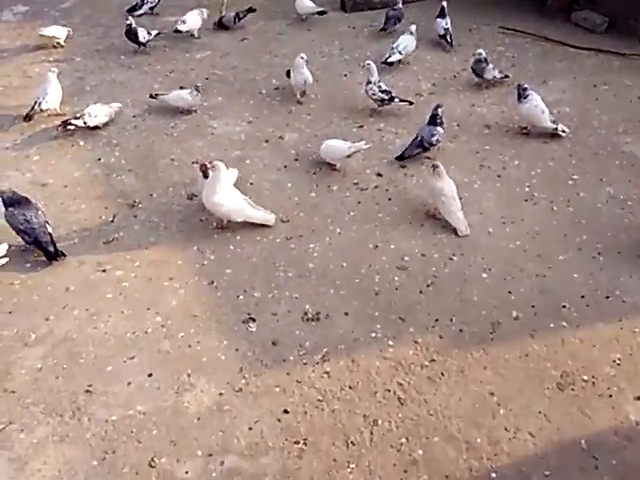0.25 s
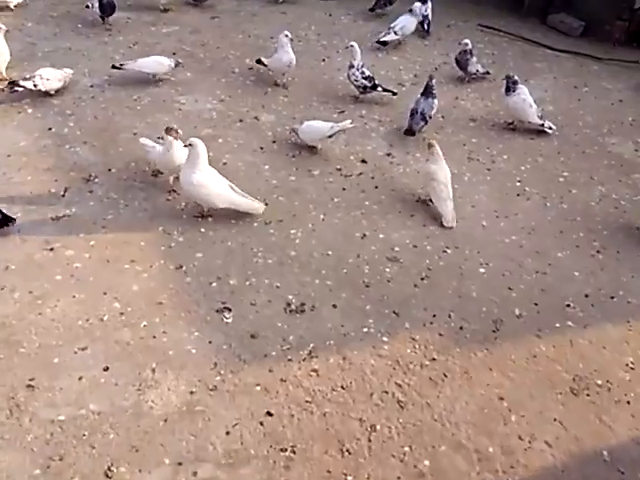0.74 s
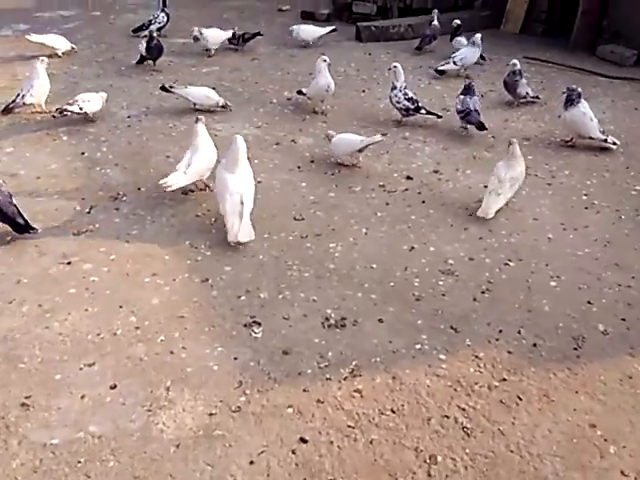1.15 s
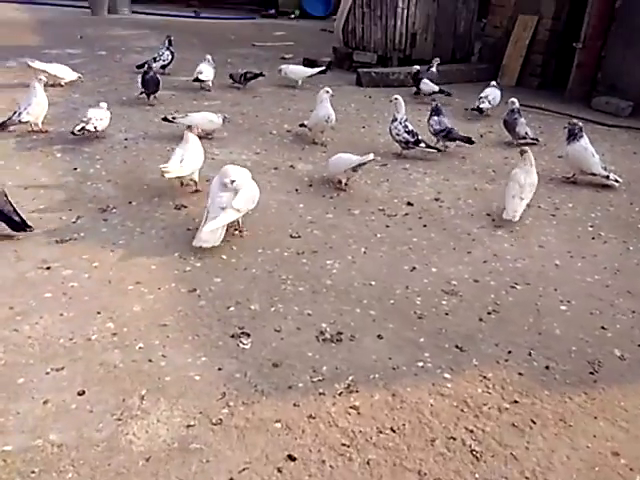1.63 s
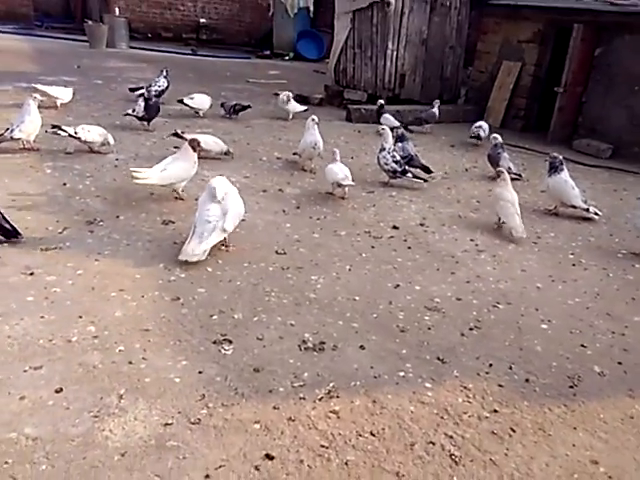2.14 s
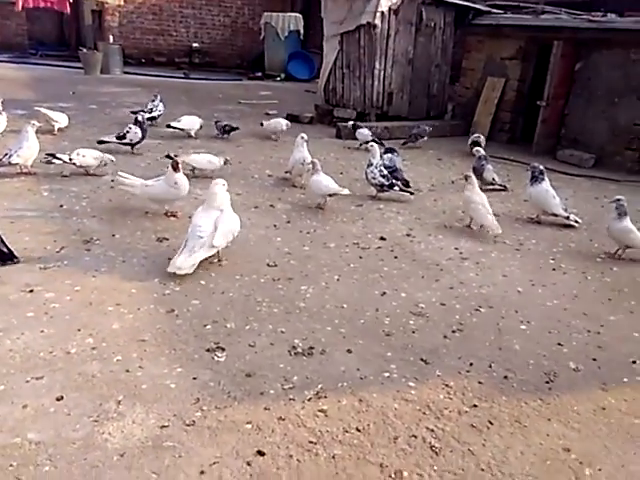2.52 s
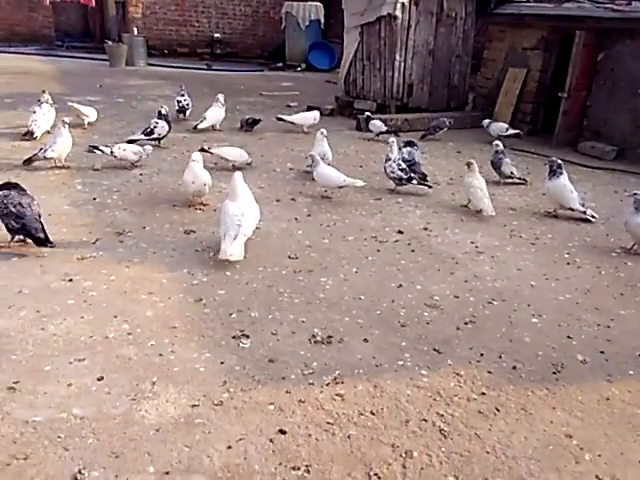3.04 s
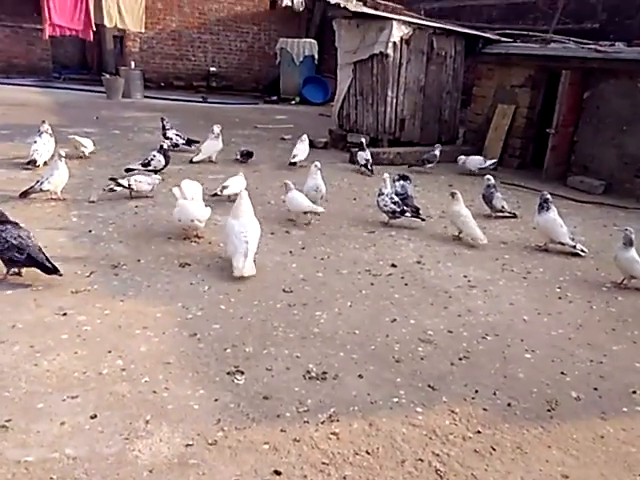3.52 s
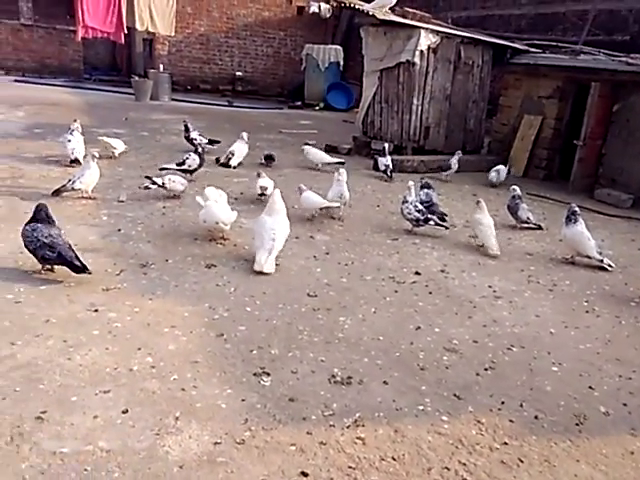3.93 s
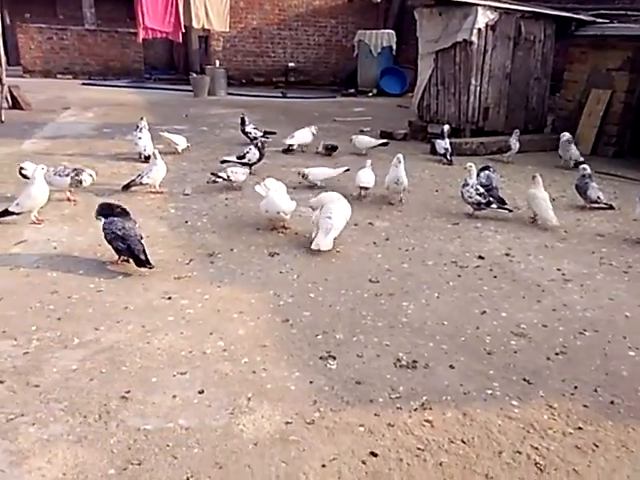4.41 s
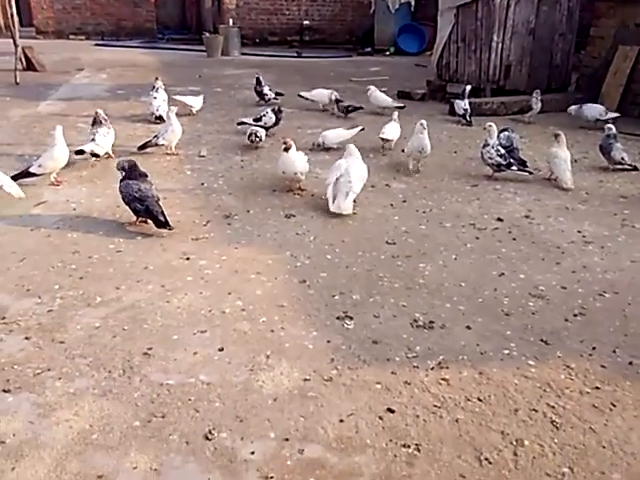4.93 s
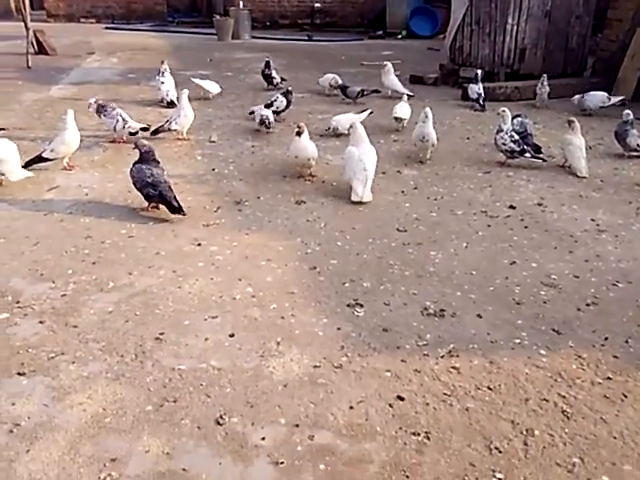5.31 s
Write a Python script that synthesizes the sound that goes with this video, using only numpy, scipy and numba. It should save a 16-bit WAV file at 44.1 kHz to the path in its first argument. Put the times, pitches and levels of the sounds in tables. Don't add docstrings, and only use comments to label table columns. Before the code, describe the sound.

Soft overlapping pigeon coos and throaty pips, dry pecks and scratches, a distant hoarse crow, then a sharp gritty footstep nearby.

```python
import sys
import numpy as np
from scipy import signal
from scipy.fft import rfft, irfft
from scipy.io import wavfile
from scipy.ndimage import uniform_filter1d
from numba import njit

SR = 44100
rng = np.random.default_rng(int(sys.argv[2]) if len(sys.argv) > 2 else 0)


def store_pcm(level_fs):
    pcm = np.round(np.clip(level_fs, -1, 1) * 32767).astype(np.int16)
    wavfile.write(sys.argv[1], SR, np.atleast_2d(pcm).T)


def to_linear_factor(level_db):
    exponent = np.asarray(level_db, float) / 20
    return 10 ** exponent


N = 245637
T = np.arange(N) / SR


def level(x, db=0):
    return x * to_linear_factor(db) / np.sqrt(np.mean(x ** 2))


@njit
def svf(x, hz, width_hz):
    y, b, l = np.empty(len(x)), 0., 0.
    for i in range(len(x)):
        g, k = np.tan(np.pi * hz[i] / SR), width_hz / hz[i]
        v = (b + g * (x[i] - l)) / (1 + g * (g + k))
        b, l, y[i] = 2 * v - b, l + 2 * g * v, k * v
    return y


def band(x, lo_hz, hi_hz):
    sos = signal.butter(2, [lo_hz, min(hi_hz, .45 * SR)], "band", fs=SR, output="sos")
    return signal.sosfiltfilt(sos, x)


def walk(rate_hz):
    k = int(SR / rate_hz)
    held = np.repeat(rng.standard_normal(N // k + 1), k)
    return 2.0 * uniform_filter1d(uniform_filter1d(held, k), k)[:N]


def grit(spread_db, per_second):
    k = int(SR / per_second)
    sizes = to_linear_factor(spread_db * np.minimum(rng.exponential(size=N // k + 1), 5))
    return level(rng.standard_normal(N) * np.repeat(sizes, k)[:N])


def add(out, s, sound):
    i = max(int(s * SR), 0)
    out[i:i + len(sound)] += sound[:N - i]


def span(s, length_s, attack_s, release_s):
    at = slice(max(int(s * SR), 0), min(int((s + length_s) * SR), N))
    t = T[at] - s
    ends = np.minimum(t / attack_s, (length_s - t) / release_s)
    return at, np.clip(t / length_s, 0, 1), np.clip(ends, 0, 1)


def ring(x, modes):
    t = T[:SR // 4]
    response = sum(to_linear_factor(db - 60 * t / t60_s) * np.sin(2 * np.pi * hz * t) for hz, t60_s, db in modes)
    return signal.fftconvolve(x, response)[:len(x)]


def blur(x, t60_s, samples):
    tail = rng.standard_normal(samples) * to_linear_factor(-60 * T[:samples] / t60_s)
    return signal.fftconvolve(x, tail / np.sqrt(np.sum(tail ** 2)))[:N]


def pip(hz, length_s, droop):
    u = np.linspace(0, 1, int(length_s * SR))
    phase = 2 * np.pi * np.cumsum(hz * (1 + droop * (.5 - u))) / SR
    return np.sin(np.pi * u ** 0.73) ** 1.98 * np.sin(phase)


def yard_air():
    # hz, density_db_per_hz
    air_spectrum = [(20, 4.5), (50, -2), (75, 2.5), (110, -12.5), (200, -4), (400, 5), (700, -3.5),
                    (1200, -24), (2500, -32), (4300, -37.5), (5200, -40.5), (8300, -45), (9400, -42),
                    (10200, -62.5)]
    ranges_hz = (220, 1100, 4500, 10200)
    # s, over_usual_db
    bustle = [(0, 5.5), (.2, 0.5), (.9, 1), (1.15, -1.5), (1.5, 1), (1.9, -1), (2.3, -1), (2.8, 0),
              (3.4, 7), (3.8, 0.7), (4.15, 0), (4.4, -2.5), (4.67, -3.5), (4.75, 0.5), (5.05, 1),
              (5.3, -0.5), (5.57, -2.5)]
    # usual_db, slope_db_per_db of bustle
    shuffle = [(-64.5, 0.5), (-67.5, 1.2), (-81, 1.77)]
    hz, db = np.transpose(air_spectrum)
    f = np.arange(N // 2 + 1) * SR / N
    tilt_db = np.interp(np.log(f + 1), np.log(hz), db)
    air = irfft(rfft(grit(1.6, 300)) * to_linear_factor(tilt_db), N)
    out = level(band(air, 12, ranges_hz[0]), -58) * to_linear_factor(walk(6))
    out += level(svf(rng.standard_normal(N), np.full(N, 70.5), 38.0), -67)
    bustle_db = np.interp(T, *np.transpose(bustle))
    shared_db = 0.53 * walk(10)
    for lo_hz, hi_hz, (usual_db, slope) in zip(ranges_hz, ranges_hz[1:], shuffle):
        gain_db = usual_db + slope * bustle_db + shared_db + 1.3 * walk(23.35)
        out += level(band(air, lo_hz, hi_hz)) * to_linear_factor(gain_db)
    return out


def crow():
    # start_s, length_s, peak_pitch_hz, end_pitch_loss_share, level_db
    caws = [
        (-.08, 0.21, 674, 0.16, -55),
        (0.874, 0.25, 589, 0.29, -61.5),
        (1.268, 0.28, 653, 0.24, -60.5),
        (1.725, 0.26, 685.5, 0.27, -58.5),
        (2.53, 0.28, 597, .15, -61.5),
        (2.99, .24, 631, 0.14, -60.5),
    ]
    # pitch_multiple, breath_width_hz, breath_share, level_db
    caw_lines = [(2, 259, 0.56, 1), (2.33, 300, 2.4, -4), (2.67, 300, 2.2, -4), (2.999, 258, 0.32, -3)]
    peak_at, rise = 0.36, 0.16
    throat_hz, throat_db_per_oct2, cycles_per_rattle = 1424, -34, 7.1
    out, breath = np.zeros(N), rng.standard_normal(N)
    jitter, waver = 1 + 0.045 * walk(70), 1 + 0.0113 * walk(60)
    for s, length_s, top_hz, sag, db in caws:
        at, u, ends = span(s, length_s, 0.061, 0.066)
        rising = 1 - rise * (1 - u / peak_at) ** 2
        falling = 1 - sag * ((u - peak_at) / (1 - peak_at)) ** 2
        hz = top_hz * np.where(u < peak_at, rising, falling)
        rattle_phase = np.cumsum(hz / cycles_per_rattle * jitter[at]) / SR % 1
        rattle = 0.48 + np.exp(-rattle_phase)
        for multiple, width_hz, breath_share, line_db in caw_lines:
            f = multiple * hz
            pure = np.sin(2 * np.pi * np.cumsum(f * waver[at]) / SR)
            hoarse = level(svf(svf(breath[at], f, width_hz), f, width_hz))
            tone = level(rattle * (pure + breath_share * hoarse))
            throat_db = throat_db_per_oct2 * np.log2(f / throat_hz) ** 2
            out[at] += ends * to_linear_factor(db + line_db + u + throat_db) * tone
    out += to_linear_factor(-19) * np.roll(out, int(.125 * SR))
    return out + to_linear_factor(-7) * blur(out, 0.39, SR // 8)


def murmur():
    # s, level_db
    flock_level = [(0, -64), (0.698, -50.5), (1.15, -56.5), (1.6, -55.5), (2.25, -58), (2.9, -49.5),
                   (3.15, -50), (3.4, -62), (3.6, -66), (3.85, -51.5), (4.1, -48), (4.3, -52.5),
                   (4.45, -50.5), (4.6, -51), (4.8, -59), (5.1, -67), (5.57, -51.5)]
    out = np.zeros(N)
    for s, high, pitch, long, size in rng.random((400, 5)):
        hz = (490 if high < .5 else 310) * (.85 + .3 * pitch)
        add(out, s * N / SR, to_linear_factor(-8 * size) * pip(hz, 0.016 + 0.061 * long ** 3, 0.13 * long))
    s, db = np.transpose(flock_level)
    return level(blur(out, 0.16, SR // 4)) * to_linear_factor(np.interp(T, s, db))


def pecks():
    # start_s, peak_db, top_re_peak_db, body_re_peak_db
    peck_events = [(0.16, -29, -9.5, -6), (0.2445, -39, -18, -24), (0.3088, -44.5, -9, -5),
                   (0.495, -33.5, -18, -28), (0.5466, -40.5, -29, -7), (0.6791, -51, -36, 4),
                   (0.9624, -36, -23, -24), (1.006, -50, -2, 7), (1.08, -52, -22, -7),
                   (1.4339, -44.5, -14, 1.5), (1.47, -59, 0, -13), (1.507, -62, 3.5, -9),
                   (1.745, -47.5, -9, -9), (2.119, -63, 15, -1), (2.373, -46, -10, 4),
                   (2.9154, -60, 12.5, 3), (4.635, -54, -24, 9), (4.8084, -40, -13.5, -25),
                   (4.8974, -44.5, -16, -2), (5.2362, -53, -5, 7), (5.336, -49, -8, -26),
                   (5.4415, -45.5, -20, 2.5),
                   (0.0207, -47.5, -3, -8), (0.0412, -43.5, -24, -7), (0.378, -54, -11, -6),
                   (0.4226, -66, -14, -8), (0.4672, -55, -21, -5), (0.528, -46, -20, -9),
                   (0.8149, -52, -12, -8), (0.846, -42, -14, -13), (0.8576, -45, -12, -5),
                   (2.0654, -63, -17, -10), (2.4433, -62, -11, -8), (2.7674, -63, -16, -8),
                   (4.741, -55, -11, -9), (4.764, -44, -11, -12), (4.8787, -51.5, -14, -14),
                   (4.9286, -48, -14, -3), (5.0004, -49, -14, -8), (5.1815, -68, -16, -6),
                   (5.2728, -53, -14, -2)]
    # start_s, peak_db, top_re_peak_db, body_re_peak_db
    scratches = [(0.0194, -33.5, -17, -6), (0.085, -37.5, -19, -22), (0.3595, -46, -34, 4),
                 (0.4825, -39.5, -41, -13), (0.649, -38.5, -8.5, -21), (0.663, -54, -20.5, 1),
                 (0.785, -43, -23, -2.5), (0.8395, -31.5, -19.5, -13), (1.354, -50.5, -3.5, -18),
                 (1.5046, -71, 18, 8), (2.288, -58, 10, 6), (2.4024, -70.5, 16, -7),
                 (4.0286, -50, -19, 7.5), (4.769, -44.5, -21.5, -27), (5.0394, -44.5, -9, -18),
                 (5.14, -51, -11, -4), (4.94, -46, -15, -8), (5.52, -59.5, -15.5, -6),
                 (5.4045, -46.5, -9.5, -7), (5.4994, -44.5, -26, -4)]
    out, grains = np.zeros(N), grit(2.9, 3000)
    ranges = [band(grains, *edges_hz) for edges_hz in ((1850, 4320), (5230, 9900), (600, 1720))]
    t = T[:SR // 8]
    # events, rise_s, t60_s, gain of the beak's first contact
    beak = (peck_events, .0006, .021, to_linear_factor(-0.5))
    claw = (scratches, .008, .11, 0)
    for events, rise_s, t60_s, tick in (beak, claw):
        decay = to_linear_factor(-11.5 - 60 * t / t60_s)
        shape = (1 - np.exp(-t / rise_s)) * decay * (1 + tick * np.exp(-t / 0.00038))
        for s, db, top_db, body_db in events:
            at = slice(int(s * SR), int(s * SR) + len(t))
            fade = shape[:len(out[at])]
            bursts = [fade * x[at] for x in ranges]
            energy = np.sum(fade ** 2)
            middle, top, body = (x * np.sqrt(energy / np.sum(x ** 2)) for x in bursts)
            out[at] += to_linear_factor(db) * (middle + to_linear_factor(top_db + 1.5) * top + to_linear_factor(body_db + 5.0) * body)
    return out


def pips():
    # start_s, peak_db, pitch_hz
    low_pips = [(0.107, -41, 291), (0.158, -38.5, 350), (0.225, -41, 378), (0.279, -48, 383),
                (0.699, -38, 313), (0.753, -32.5, 354), (0.832, -33.5, 376), (0.914, -34.5, 307),
                (0.967, -51, 282), (0.995, -43, 250), (1.347, -42.5, 291.4), (1.399, -42.5, 300),
                (1.654, -44, 288), (2.36, -47.5, 272.5), (2.506, -44.5, 323), (2.538, -41, 258),
                (2.653, -43.5, 271), (2.688, -38, 278), (2.732, -32.5, 310), (2.803, -31.5, 356),
                (2.821, -39, 314), (2.884, -37.5, 296), (2.929, -38.5, 353), (3.948, -40, 345),
                (4.026, -29.5, 344), (4.1, -30.5, 334), (4.293, -41.5, 282), (5.033, -50.5, 335),
                (5.307, -49, 313), (5.541, -35, 333.6)]
    # start_s, peak_db, pitch_hz
    high_pips = [(0.991, -48, 503), (1.329, -42, 555), (1.385, -47, 420), (1.447, -41.5, 415),
                 (1.489, -44.5, 394), (1.583, -43.5, 450), (1.728, -35.5, 452), (1.769, -36, 430),
                 (1.943, -46.5, 524), (2.208, -45, 468), (2.538, -39, 437), (2.598, -39, 489),
                 (2.655, -39, 460), (2.697, -45, 504), (2.716, -37, 429), (2.765, -39, 502),
                 (2.828, -40.5, 458), (2.884, -41, 480), (2.924, -53, 482), (4.039, -43.5, 490),
                 (4.618, -43, 485), (4.912, -55, 466), (4.967, -52.5, 457), (5.097, -54, 460),
                 (5.172, -53.5, 480), (5.267, -56, 494), (5.382, -60, 476), (5.413, -53, 480)]
    # start_s, peak_db, pitch_hz
    far_pips = [(.662, -44, 725), (2.122, -49.5, 658), (2.401, -52.5, 820), (2.604, -54, 752),
                (3.982, -50.5, 716), (4.518, -53, 740), (4.777, -56, 654), (4.828, -56, 650),
                (5.509, -53.5, 660), (4.919, -56, 1620), (5.118, -57.5, 1640), (5.276, -59, 1644)]
    out = np.zeros(N)
    for s, db, hz in low_pips + high_pips + far_pips:
        add(out, s - .004, to_linear_factor(db) * pip(hz, 0.017 + 2.5 / hz, .06))
    return out


def coos():
    # start_s, length_s, first_hz, last_hz, level_db
    short_coos = [
        (0.392, 0.089, 512.5, 438, -51.5),
        (1.65, 0.034, 600, 500, -46.5),
        (1.695, 0.084, 485, 416, -45.5),
        (1.767, 0.036, 362, 347, -39.5),
        (2.949, 0.076, 494, 496, -46),
        (3.006, 0.058, 488, 443, -37.5),
        (5.425, 0.11, 330, 276, -56.5),
    ]
    # start_s, length_s, first_hz, last_hz, level_db
    answers = [(3.18, 0.072, 556, 526, -48.5), (3.255, 0.042, 490, 495, -40.5),
               (4.28, 0.051, 521, 488, -55), (4.392, 0.037, 443, 403, -46), (4.5, 0.043, 507, 518, -54),
               (4.612, 0.046, 556, 563, -48.5), (4.729, 0.037, 433, 473, -45.5),
               (4.9, 0.056, 495, 470, -55.5), (.77, 0.11, 534, 502, -56.5),
               (1.151, 0.13, 590.4, 515, -49.5), (2.016, 0.078, 304.6, 326, -49),
               (3.144, 0.065, 344, 349, -40.5), (3.214, 0.073, 359, 310.5, -40),
               (4.467, 0.066, 499, 422, -48), (4.59, 0.058, 521, 450, -46.5)]
    # start_s, length_s, first_hz, last_hz, level_db
    far_notes = [
        (1.96, 0.065, 1400, 1330, -60),
        (3.055, .11, 1275, 1235, -52.5),
        (2.8, 0.199, 1400, 1490, -67.5),
        (4.5, 0.056, 1500, 2000, -74),
        (4.225, 0.066, 714, 742, -57),
        (4.245, 0.092, 1187, 1264, -68),
        (4.51, 0.079, 1100, 1260, -71.5),
        (5.3, .11, 1096, 1300, -69),
        (4.97, 0.16, 1200, 1500, -72),
    ]
    settle_s, fade_db_per_s = 0.0968, -9.5
    out, throb, waver_hz = np.zeros(N), to_linear_factor(0.6 * walk(83)), 6.73 * walk(70)
    for s, length_s, first_hz, last_hz, db in short_coos + answers + far_notes:
        at, u, ends = span(s, length_s, 0.011, 0.017)
        settled = (1 - np.exp(-u * length_s / settle_s)) / (1 - np.exp(-length_s / settle_s))
        hz = first_hz + (last_hz - first_hz) * settled
        phase = 2 * np.pi * np.cumsum(hz + waver_hz[at]) / SR
        tone = np.sin(phase) + to_linear_factor(-27.0) * np.sin(2 * phase)
        gain = to_linear_factor(db + fade_db_per_s * length_s * u)
        out[at] += np.sqrt(2) * ends * throb[at] * gain * tone
    return out


def long_coos():
    # s, pitch_hz, level_db
    breaths = [
        [(0.44, 390, -51), (0.45, 385.4, -46), (0.504, 331, -40.5), (0.54, 370, -48.5), (0.58, 349.6, -49.5),
         (0.63, 325, -42), (0.638, 311, -51), (0.668, 298, -42), (0.69, 282, -57)],
        [(1.04, 437, -57), (1.068, 371.5, -43), (1.12, 320, -40), (1.176, 294.9, -39.5), (1.206, 283, -46.5),
         (1.226, 273, -40), (1.248, 271, -44), (1.29, 255, -44), (1.31, 261, -53)],
        [(1.81, 370, -47), (1.828, 362, -48), (1.838, 357, -56), (1.852, 354, -44.5), (1.89, 338, -46.5),
         (1.952, 304.4, -43), (2.014, 272.4, -44.5), (2.03, 267, -55)],
        [(3.055, 362, -43.5), (3.085, 352.6, -34), (3.101, 344, -36.5), (3.141, 294.7, -42.5),
         (3.165, 279, -49), (3.173, 266, -46), (3.183, 268, -54), (3.187, 269.5, -43), (3.22, 262, -52)],
        [(4.33, 392, -59), (4.336, 394, -40), (4.366, 368.6, -36), (4.422, 297.4, -41.5), (4.5, 317, -42),
         (4.52, 290.8, -54), (4.538, 286, -43.5), (4.582, 271.9, -51), (4.585, 274.6, -54)],
        [(4.655, 527, -54), (4.671, 473, -46), (4.699, 374, -37.5), (4.749, 337.4, -45.5), (4.803, 321, -42),
         (4.813, 317, -54), (4.831, 319, -43), (4.879, 269.4, -53.5), (4.93, 252, -60)],
    ]
    out, waver_hz = np.zeros(N), 3.84 * walk(80)
    for s, hz, db in (np.transpose(breath) for breath in breaths):
        at, _, ends = span(s[0], s[-1] - s[0], 0.0044, 0.005)
        phase = 2 * np.pi * np.cumsum(np.interp(T[at], s, hz) + waver_hz[at]) / SR
        tone = np.sin(phase) + to_linear_factor(-25) * np.sin(2 * phase)
        out[at] += np.sqrt(2) * ends * to_linear_factor(np.interp(T[at], s, db)) * tone
    return out


def high_flickers():
    # start_s, level_db
    flicker_events = [(0.61, -63), (0.999, -74), (1.299, -65.5), (1.3578, -64.5), (1.41, -82.5), (2.067, -61.5),
                      (2.1236, -63), (2.178, -70), (2.416, -55), (2.4611, -62.5), (2.7864, -62), (2.917, -62),
                      (2.9685, -88), (3.33, -52), (4.708, -67), (5.0678, -70), (5.249, -71), (5.3474, -74)]
    # hz, t60_s, level_db
    flicker_modes = [(5650, 0.1, -0.5), (6670, 0.36, -4), (10000, 0.06, 0), (9520, 0.1, 8.5), (9310, 0.12, 5)]
    taps = np.zeros(N)
    for (s, db), chance in zip(flicker_events, rng.random((len(flicker_events), 8, 2))):
        for late, size in chance:
            add(taps, s + 0.041 * late, np.array([to_linear_factor(db - 11.5 - 17 * size)]))
    return ring(taps, flicker_modes)


def shoes():
    # start_s, length_s, level_db, top_re_level_db, body_re_level_db
    scuffs = [(3.01, 0.06, -51, -6, 2), (3.049, 0.046, -64, -1, 13), (3.158, 0.081, -64.5, -4, 12.5),
              (3.262, 0.069, -56, -2.5, 12), (3.302, .11, -50, -5, 7), (3.398, 0.06, -61.5, 3.5, 13),
              (3.431, 0.24, -60, 3.5, 2), (3.533, 0.051, -54, -2.5, 14), (3.555, .1, -45, -6.5, -4.5),
              (3.627, 0.093, -77, -22, 16.5), (3.695, 0.066, -66.5, -55, 12.5),
              (3.852, 0.13, -46.5, -10, -4)]
    # start_s, peak_db, contact_s, first_swing (signed gain)
    knocks = [(0.673, -37.5, 0.0017, 1), (3.0163, -31.5, 0.0037, -0.82), (3.041, -36, 0.0049, -0.69),
              (3.066, -47, 0.0093, 0.63), (3.104, -49, 0.0083, -0.94), (3.135, -47, 0.0043, -0.89),
              (3.19, -41, 0.0074, -0.44), (3.281, -41, 0.0053, -1.1), (3.294, -34, 0.0056, 0.85),
              (3.5453, -15.5, 0.0011, 0.99), (3.5602, -27.5, .0016, 1), (3.569, -27, 0.0038, 0.8),
              (3.598, -40, .0031, -0.6), (3.917, -36, 0.0023, -1.15), (3.951, -32, 0.0017, 0.9),
              (4.6203, -36, .0012, -1.2)]
    # start_s, peak_db, pitch_hz
    crunches = [(3.292, -25.5, 697), (3.304, -28.5, 835), (3.316, -31, 848), (3.328, -38, 711),
                (3.341, -34, 891), (3.353, -30, 656), (3.371, -30, 479), (3.382, -26, 830),
                (3.392, -30.5, 380), (3.404, -30.5, 564), (3.433, -30.5, 520), (3.438, -41, 740),
                (3.563, -30, 510), (3.577, -44, 910)]
    # hz, t60_s, level_db
    shoe_modes = [(79.5, 0.056, -0.5), (330, 0.013, 6), (855, 0.026, 5.5)]
    out, blows = np.zeros(N), np.zeros(N)
    grains, coarse = grit(1.77, 2500), grit(1.83, 600)
    edges_hz = ((1300, 4000), (4000, 6600), (6600, 9700))
    middle, top, air = (level(band(grains, *edges)) for edges in edges_hz)
    body = level(band(coarse, 150, 1300))
    for s, length_s, db, top_db, body_db in scuffs:
        at, u, ends = span(s, length_s, 0.018, 0.0094)
        swell = ends * np.abs(np.sin(np.pi * u)) ** 0.88
        bright = to_linear_factor(top_db) * (top[at] + 0.34 * air[at])
        out[at] += swell * to_linear_factor(db) * (middle[at] + bright + to_linear_factor(body_db + 4.0) * body[at])
    for s, db, contact_s, swing in knocks:
        push = np.hanning(int(contact_s * 1.09 * SR))
        back = np.concatenate([np.zeros(int(contact_s * SR)), push])
        add(blows, s, swing * to_linear_factor(db) * push)
        add(blows, s, -.75 * swing * to_linear_factor(db) * back)
    for s, db, hz in crunches:
        add(out, s - .001, to_linear_factor(db - 4.5) * pip(hz, 0.004 + 2.8 / hz, 0.14))
    return out + blows + to_linear_factor(-39.5) * ring(blows, shoe_modes)


def scene():
    # delay_s, level_db
    yard_echoes = [(0.01, -18), (0.023, -16.5), (0.041, -19.5), (.067, -18)]
    others = yard_air() + murmur() + high_flickers() + shoes()
    voices, beaks, near = crow() + pips() + coos(), pecks(), long_coos()
    echoed = voices + to_linear_factor(-6.0) * beaks
    echoes = sum(to_linear_factor(db) * np.roll(echoed, int(delay_s * SR)) for delay_s, db in yard_echoes)
    haze = to_linear_factor(-11) * blur(voices + beaks + to_linear_factor(-4.0) * near, 0.66, SR // 2)
    return (voices + beaks + near + echoes + haze + others)[None]


def top_cut(x):
    return signal.sosfilt(signal.butter(12, 9700, fs=SR, output="sos"), x)


def record(dry):
    return top_cut(dry)


dry = scene()
out = record(dry)
store_pcm(out)
```